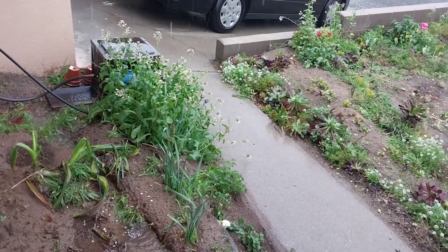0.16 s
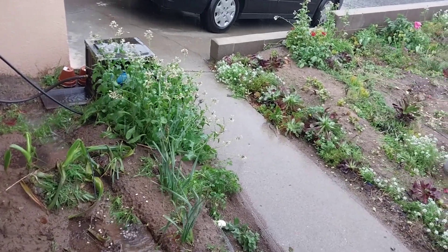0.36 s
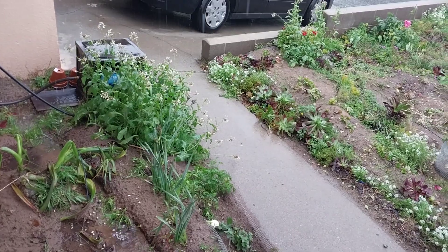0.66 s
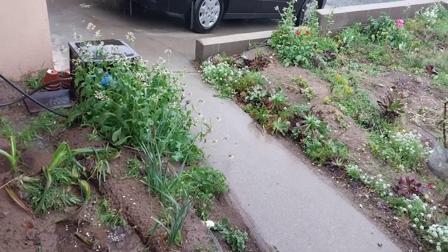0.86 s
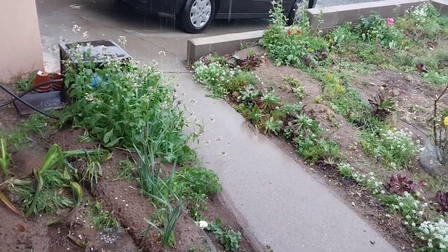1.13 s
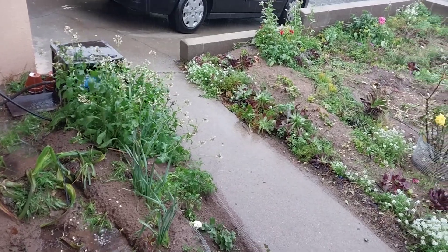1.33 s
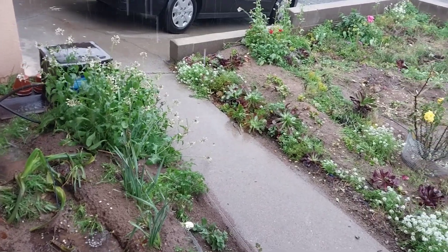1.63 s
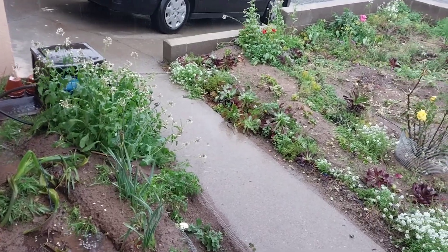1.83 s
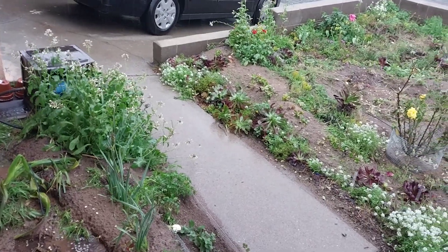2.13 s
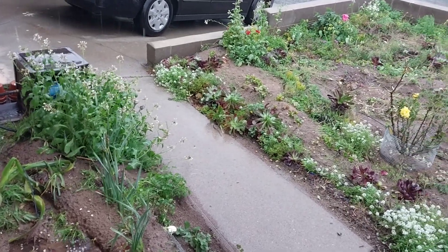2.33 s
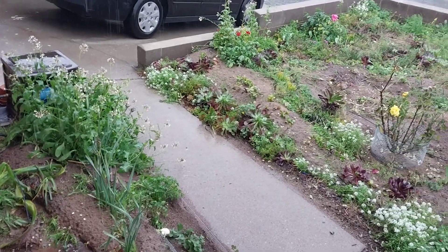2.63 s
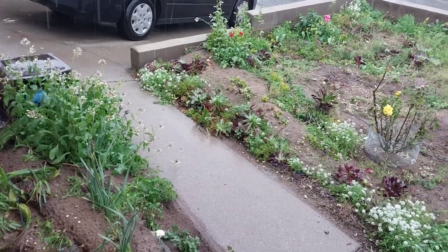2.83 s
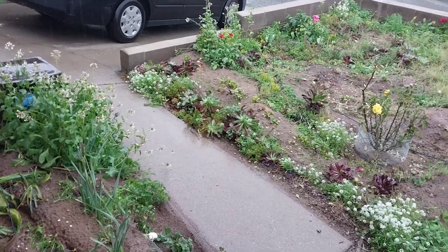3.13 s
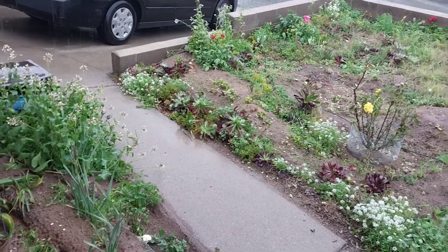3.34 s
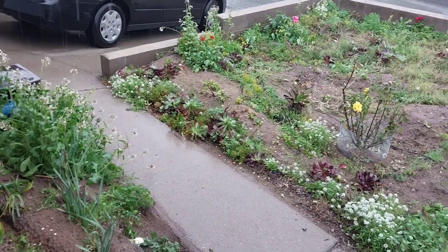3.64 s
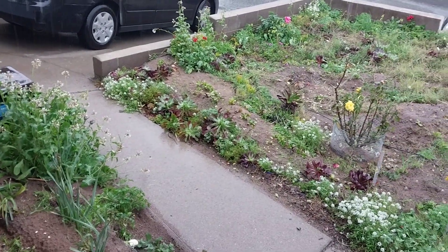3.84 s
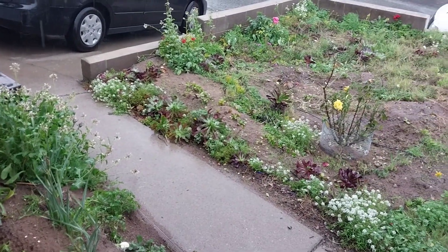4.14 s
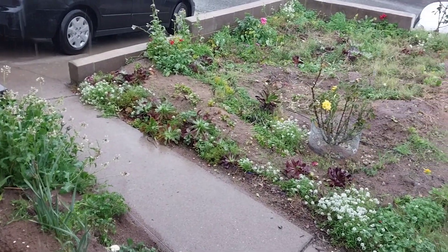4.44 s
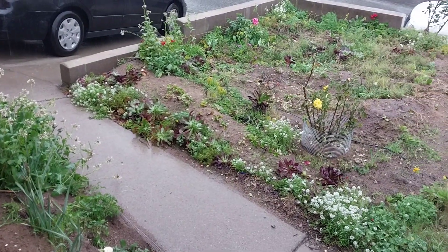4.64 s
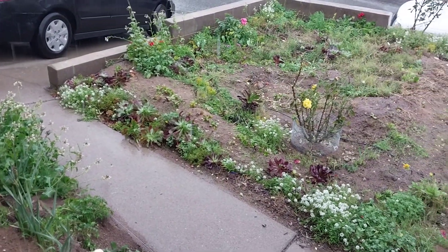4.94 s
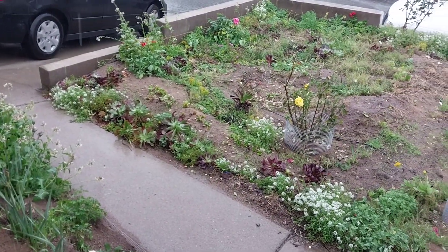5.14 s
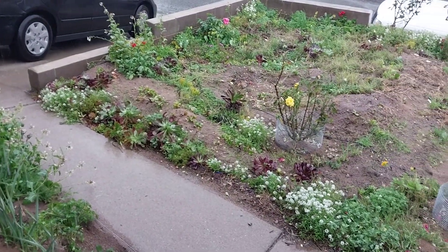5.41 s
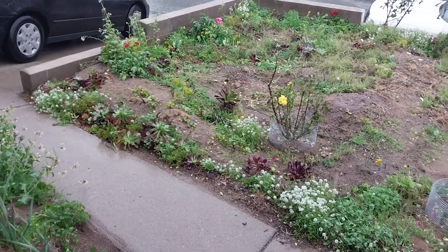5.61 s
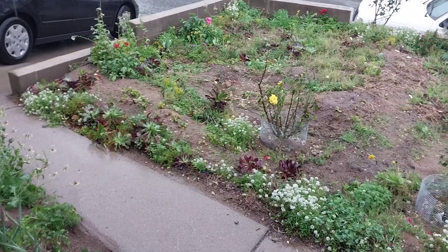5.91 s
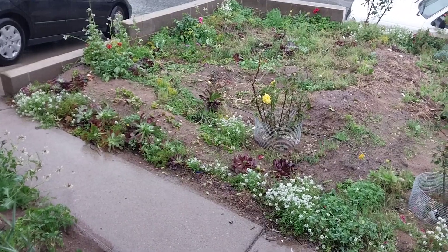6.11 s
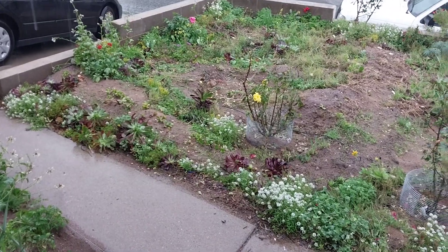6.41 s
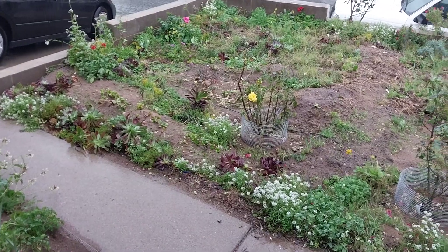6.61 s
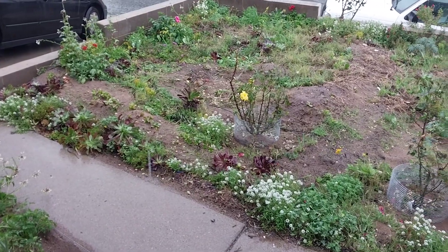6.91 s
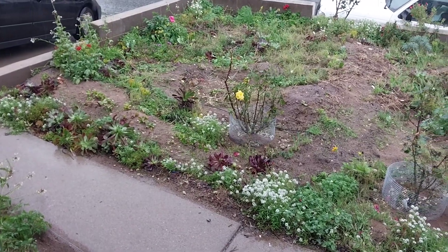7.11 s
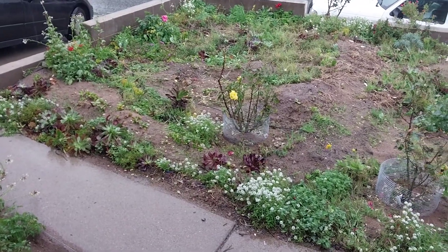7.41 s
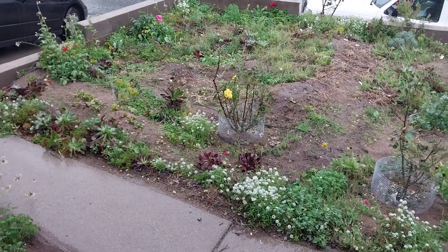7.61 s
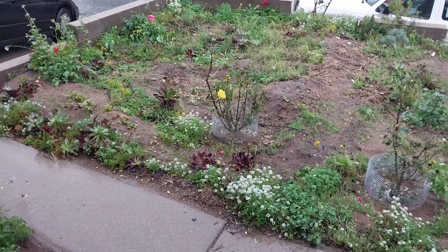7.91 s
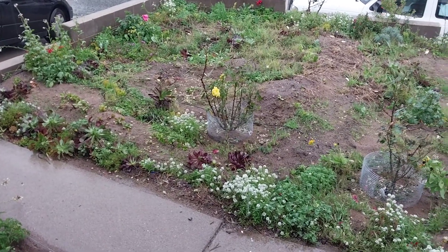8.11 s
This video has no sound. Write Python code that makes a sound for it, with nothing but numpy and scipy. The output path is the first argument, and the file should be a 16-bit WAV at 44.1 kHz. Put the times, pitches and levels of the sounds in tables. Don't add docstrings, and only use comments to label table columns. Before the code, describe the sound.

Steady rain falls in a garden, heard close through a hand-held stereo microphone. From 0 to 1.2 s heavy low wind thumps hit the left side hardest, peaking near 0.6-0.8 and 1.05 s, with separate weaker buffets on the right; sharp drips crack through, one strong at 0.9. Rain hiss dips around 1.25-2.3 s as smaller thuds fade out. From 2.7 s irregular close drops slap the path several times a second, each with bright fizz, brief wall echoes and wet splash; firm ones land near 2.75, 3.35, 5.75 and, loudest, 6.27 s. Small high puddle bubbles plop throughout; deep drain gurgles sound softly at 5.3 and 7.9 s. Behind lie fine leaf ticks, farther patter, wide hiss and a gently swelling low rumble. Light wind puffs return, with a modest buffet near 6.95 s, and rain continues to the end at 8.25 s.

```python
import sys
import numpy as np
from scipy import signal
from scipy.fft import rfft, irfft, next_fast_len
from scipy.io import wavfile
from scipy.ndimage import uniform_filter1d

SR = 44100
rng = np.random.default_rng(int(sys.argv[2]) if len(sys.argv) > 2 else 0)


def volts_from_decibels(level):
    exponent = np.asarray(level, float) / 20
    return 10 ** exponent


def inscribe(sig):
    pcm = np.round(np.clip(np.atleast_2d(sig).T, -1, 1) * 32767)
    wavfile.write(sys.argv[1], SR, pcm.astype(np.int16))


N = 364266

# start_s, rain_db, rumble_db
RAINFALL = [(0.0, -38.5, -47), (0.82, -40, -43.5), (1.25, -46, -49.5), (2.15, -46.5, -46),
            (2.3, -46.5, -53), (2.52, -41, -53), (2.65, -46, -50.5), (3.1, -43, -45.5),
            (3.45, -44.5, -45.5), (3.7, -42.5, -45.5), (4.4, -45.5, -46), (4.62, -43.5, -46),
            (5.07, -45, -46), (5.38, -43, -45), (6.1, -43.5, -47), (6.9, -43.5, -45.5), (7.22, -43, -47),
            (8.25, -44, -47.5)]
# freq_hz, level_db (per Hz)
RAIN_COLOUR = [(300, -0.5), (520, -3.5), (800, 0), (1260, -1), (1800, 0), (2700, -9.5), (4500, -7.5),
               (5500, -8), (7500, -6.5), (8150, -13.5), (10000, -10), (12500, -4.5), (15600, -10.5),
               (17000, -24)]


def evened(x):
    return x / np.sqrt(np.mean(x ** 2, axis=-1, keepdims=True) + 1e-20)


def read(points, hz):
    f, value = np.transpose(points)
    return np.interp(np.log(hz + 1), np.log(f + 1), value)


def curve(rows, column=1):
    rows = np.asarray(rows, float)
    return np.interp(np.arange(N) / SR, rows[:, 0], rows[:, column])


def add(mix, s, sound):
    part = mix[:, max(round(s * SR), 0):][:, :sound.shape[1]]
    part += sound[:, :part.shape[1]]


def humps(rows):
    fall_db = 17.5
    t, power = np.arange(0, N, 64) / SR, 0
    for s, peak_db, half_s in rows:
        distance = abs(t - s) / max(half_s, 0.01)
        power = power + volts_from_decibels(2 * (peak_db - fall_db * distance))
    return np.interp(np.arange(N) / SR, t, power)


def drips(rows, grain_db, tail_t60):
    # delay_s, level_db
    wall_echoes = [
        (.0055, -7),
        (.009, -13),
        (.017, -16),
    ]
    slap_q, skirt = 2.9, 0.42
    fizz_from_hz, fizz_gain_db = 9240, 8.5
    s, slap_db, slap_hz, fizz_db, splash_db = np.transpose(rows)
    count, size = len(s), 2048
    t, hz = np.arange(size) / SR, np.fft.rfftfreq(size, 1 / SR) + 1
    noise = rng.standard_normal((count, 3, size))

    crack = 0.55 * noise[:, :1] * np.exp(-t / 0.0005)
    crack[..., 0] = 1.2
    lag_s = 0.0004 * rng.random((count, 1, 1)) * np.array([[0], [1]])

    echo_s = np.transpose(wall_echoes)[0] * rng.uniform(0.91, 1.186, (count, 1, len(wall_echoes))) + 0.001
    echoes = 0
    for k, (_, db) in enumerate(wall_echoes):
        echoes = echoes + volts_from_decibels(db) * np.exp(-((t - echo_s[..., [k]]) / 0.00077) ** 2)
    swell = (1 - np.exp(-t / 0.00051)) * volts_from_decibels(-60 * t / tail_t60) * (1 - t / t[-1])
    spray = volts_from_decibels(2.2 * rng.standard_normal((count, 1, size // 32))).repeat(32, axis=2)
    splash = spray * noise[:, 1:] * (swell + volts_from_decibels(10.0) * echoes) * volts_from_decibels(splash_db - 5)[:, None, None]

    crack_spectrum = rfft(crack) * np.exp(-2j * np.pi * hz * (lag_s + 0.0005))
    splash_spectrum = rfft(splash) * volts_from_decibels(-3.0 * hz / 10000)
    z = np.array([crack_spectrum, splash_spectrum])
    grain = evened(uniform_filter1d(rng.standard_normal((count, len(hz))), size=46, axis=1))
    colour_db = read(RAIN_COLOUR, hz)
    z *= volts_from_decibels(grain_db * grain + colour_db - uniform_filter1d(colour_db, size=330))[:, None]

    tune = hz / slap_hz[:, None]
    detuning = 1j * slap_q * (tune - 1 / tune)
    slap = 1 / (1 + detuning / 3) * (skirt + 1 / (1 + detuning)) / (1 + (hz / 9000) ** 6)
    fizz = 1 / (1 + (fizz_from_hz / hz) ** 6) + 0 * tune
    sounds = 0
    for shape, db in ((slap, slap_db), (fizz, slap_db + fizz_db + fizz_gain_db)):
        blow, tail = irfft(z * shape[:, None], size)
        peak = abs(blow).max(axis=2).mean(1)
        sounds = sounds + (blow + tail) * (volts_from_decibels(db) / peak)[:, None, None]
    out = np.zeros((2, N))
    for start, sound in zip(s, sounds):
        add(out, start, sound)
    return out


def eave_drips():
    # start_s, slap_peak_db, slap_pitch_hz, fizz_db
    # (against slap), splash_db
    earlier = [(0.0361, -21, 2630, -8, -18.5), (0.0529, -17.5, 7460, -4, -16.5),
               (0.159, -17.5, 4230, -7, -16), (0.2685, -31, 5950, -13, -17), (0.316, -31, 7640, 5, -13),
               (0.3535, -27, 6100, 6.5, -15), (0.4234, -33, 6210, 11, -17), (0.5671, -29, 5750, -7, -14),
               (0.6601, -24.5, 3540, -3, -15), (0.7362, -29, 5690, 5, -15), (0.7598, -21, 4450, -4, -15),
               (0.812, -25, 5850, -1, -16), (0.8757, -11.5, 7060, -10, -23.5),
               (0.9173, -16.5, 2830, -11, -17.5), (0.9543, -22.5, 4000, -8, -18),
               (1.067, -33.5, 7440, -2, -10.5), (1.117, -32.5, 4400, -5, -13), (1.2471, -41, 4300, -20, -24),
               (1.3766, -20, 4200, -9, -25), (1.436, -34, 7510, -5, -17), (1.4681, -44, 5890, -15, -25),
               (1.5813, -42, 7380, 9, -15), (1.6575, -26.5, 5030, -6, -16.5), (1.703, -34, 7600, -5, -8.5),
               (1.8136, -39, 7390, -4, -18), (1.8312, -28, 3770, -10, -18), (1.895, -37, 4570, -7, -20),
               (2.0837, -35, 5330, -14, -20), (2.132, -35, 5150, -3, -13), (2.2752, -50, 3940, -18, -22),
               (2.2947, -29, 4810, -4, -20), (2.3321, -37, 6200, -5, -12), (2.4606, -27.5, 6400, -5, -16),
               (2.5092, -38, 3950, -7, -25), (2.5738, -27, 6040, 2, -17), (2.6559, -29, 5780, -10, -20),
               (2.7356, -15, 7300, -19, -20), (2.7535, -17.5, 5340, -4, -20),
              (2.8762, -23.5, 5030, -7, -15.5), (2.9804, -28.5, 4000, 0, -15),
              (3.0373, -30, 7260, -13, -20), (3.1052, -29.5, 7610, -7, -14), (3.1597, -25, 6200, -2, -16),
              (3.209, -26.5, 7620, 3, -18), (3.3, -36, 7060, -3, -9), (3.3443, -15, 5330, -21, -23),
              (3.3613, -22.5, 3930, -8, -14.5), (3.3945, -27, 6300, 7.5, -16),
              (3.4205, -21.5, 4890, -4, -20), (3.4857, -35, 4030, -8, -10), (3.5562, -18, 5230, -12, -17),
              (3.693, -36, 5110, 4, -18), (3.718, -23.5, 6500, -1, -14.5), (3.9124, -23, 3600, -4, -14),
              (3.982, -28.5, 4190, 1, -14), (4.0383, -26.5, 5840, -13, -21),
              (4.0624, -28.5, 7000, -2, -10.5), (4.1166, -30, 5750, -10, -16), (4.175, -33, 5290, 5.5, -19),
              (4.2618, -52, 5590, -5, -20), (4.327, -34.5, 3060, -3, -14.5), (4.4078, -30, 2550, -13, -24),
              (4.4454, -28, 3720, 2, -19), (4.4633, -28.5, 3770, -16, -14), (4.538, -27, 6000, -6, -27),
              (4.559, -38, 5040, 8, -12), (4.5826, -21, 4700, 0, -19), (4.6527, -27, 6400, -8, -16),
              (4.7472, -30.5, 5660, -5, -14.5), (4.7851, -28.5, 6000, -11, -23),
              (4.851, -35.5, 3600, -1, -9), (4.887, -32, 4960, 6, -23), (4.9193, -47, 6230, -3, -20),
              (4.9916, -34, 3750, -9, -15), (5.009, -33, 6340, -14, -20), (5.1116, -29.5, 7230, 6.5, -15.5)]
    # start_s, slap_peak_db, slap_pitch_hz, fizz_db, splash_db
    late = [(5.113, -41, 7220, 3, -21), (5.158, -30.5, 5100, -7, -14), (5.2802, -30.5, 5970, -5, -6.5),
            (5.3834, -33, 5450, -10, -10), (5.454, -28, 7200, -11, -19), (5.487, -34.5, 7400, -14, -8),
            (5.518, -34, 5290, -11, -18), (5.666, -18.5, 5760, -3.5, -22.5), (5.753, -28.5, 3000, -3, -17),
            (5.7655, -13, 6200, -0.5, -26), (5.86, -21, 4740, -25, -27), (5.915, -29, 6650, -14, -13.5),
            (6.056, -34, 6980, -6, -17), (6.0696, -22, 7280, -8, -15.5), (6.1784, -28, 7060, -5, -21),
            (6.2268, -34, 7790, 1, -16), (6.24, -20.5, 3940, -9, -14.5), (6.2692, -6.5, 6900, -8.5, -22),
            (6.334, -40, 6480, 14, -20), (6.4353, -18, 4100, -9, -12.5), (6.4956, -26, 2800, -2, -11),
            (6.5724, -22, 6200, -7, -15.5), (6.6684, -34, 5400, 2, -12), (6.8176, -30, 3960, -10, -16),
            (6.8642, -24, 6950, -15, -12), (6.9534, -32.5, 5250, 9, -19), (7.0688, -29.5, 5350, 7, -13.5),
            (7.1358, -27.5, 4030, -13, -12.5), (7.2923, -26, 4890, -6, -20),
            (7.312, -26.5, 3280, -5, -10.5), (7.3876, -48, 5560, -11, -30), (7.4635, -37, 5450, -10, -13),
            (7.5162, -31, 5400, -4, -17), (7.653, -35, 5490, -12, -16), (7.699, -25, 3600, -17, -20),
            (7.717, -26.5, 5270, 3, -20), (7.787, -20, 5550, -11, -16.5), (7.8387, -31.5, 3570, 0, -12),
            (8.0776, -28.5, 5700, 0, -20), (8.1143, -27, 4240, -4, -13)]
    # start_s, slap_peak_db, slap_pitch_hz, fizz_db, splash_db
    leaves = [(0.2284, -37, 7380, 10, -22), (0.5044, -34, 6310, 5, -25), (0.691, -39, 2250, 15, -30),
              (0.9338, -21.5, 3760, -6, -16), (0.9854, -29, 2400, 12, -19), (1.4047, -39.5, 6740, 10, -22),
              (1.5937, -34.5, 7380, 3, -20), (1.7397, -30, 5180, 3, -16), (2.1836, -40.5, 2690, 9, -14),
              (2.8876, -18, 4730, -6, -19), (3.3857, -28, 6960, 2, -22), (3.5024, -32, 7450, 1, -16),
              (3.565, -29, 7520, 0, -30), (3.899, -38, 3530, -2, -17), (4.3322, -26, 5630, 1.5, -18.5),
              (4.5687, -31, 5180, 1, -27), (4.597, -20, 4650, -11, -20), (4.6787, -29, 3730, -12, -19),
              (5.255, -33, 3780, -6, -17), (5.8477, -32, 5140, -24, -15), (5.9464, -33, 5270, 3, -12),
              (6.4617, -35, 3070, 3, -26), (6.4768, -27, 2630, -9, -25), (6.5144, -24.5, 5140, -19, -14),
              (6.738, -46, 2330, 21, -22), (6.886, -24, 5300, -15, -19), (7.7384, -45, 5170, 15, -26),
              (8.159, -32.5, 7610, 2, -10)]
    return drips(np.vstack([earlier, late, leaves]), grain_db=2.0, tail_t60=0.41)


def plops(rows, cycles):
    out = np.zeros((2, N))
    for (s, db, hz), twin in zip(rows, rng.uniform(0.93, 0.98, len(rows))):
        t = np.arange(0, cycles / hz, 1 / SR)
        turns = hz * (t[None] - [[0], [0.00006]])
        turns = turns * (1 + 0.00063 * turns)
        ring = np.sin(2 * np.pi * turns) + 1.43 * np.sin(2 * np.pi * twin * turns)
        decay = volts_from_decibels(db - 60 * hz * t / cycles)
        add(out, s, decay * (1 - np.exp(-hz * t / 9.8)) * ring)
    return out


def near_bubbles():
    # start_s, peak_db, pitch_hz
    puddle_bubbles = [(0.562, -39, 3240), (1.113, -39, 4430), (1.248, -33, 4450), (1.834, -35.5, 3850),
                      (1.986, -50, 847), (2.276, -47, 3950), (2.411, -38.5, 1856), (2.498, -50, 3900),
                      (2.859, -41, 1740), (3.316, -41, 1780), (3.361, -41, 1830), (3.396, -47, 3100),
                      (3.648, -40, 1706), (3.915, -52, 3550), (3.977, -37, 1970), (4.316, -46, 3070),
                      (4.458, -39, 3740), (4.481, -50, 2180), (4.842, -45, 1800), (4.957, -42, 2210),
                      (6.122, -39, 1870), (6.436, -32, 4630), (6.521, -40, 4600), (7.262, -40, 1800),
                      (7.307, -38, 3200), (7.791, -39, 2100), (7.853, -33.5, 3630), (8.11, -45, 4330),
                      (8.165, -47, 754)]
    # start_s, peak_db, pitch_hz
    drain_gurgles = [
        (1.639, -44, 1050),
        (5.308, -40.5, 376),
        (7.637, -56, 960),
        (7.889, -46.5, 373),
    ]
    return plops(puddle_bubbles + drain_gurgles, cycles=100.0)


def far_bubbles():
    u = rng.random((160, 3))
    rows = np.column_stack([u[:, 0] * N / SR, -53 + 8 * u[:, 1], 800 + 2200 * u[:, 2]])
    return plops(rows, cycles=90.0)


def patter(count, size_db, spread_db):
    u = rng.random((count, 3))
    start_s = u[:, 0] * N / SR
    peak_db = size_db - spread_db * np.log(u[:, 1] + 0.056)
    pitch_hz = 1800 * 4 ** u[:, 2]
    fizz_and_splash_db = np.clip(rng.standard_normal((count, 2)), -2, 1) * [5, 4] + [-5, -11]
    rows = np.column_stack([start_s, peak_db, pitch_hz, fizz_and_splash_db])
    return drips(rows, grain_db=2.5, tail_t60=0.24)


def ticks(per_s, spread_db):
    size = volts_from_decibels(spread_db * np.minimum(rng.exponential(1, (2, N)), 5))
    size *= rng.random((2, N)) < per_s / SR
    size *= rng.choice([-1., 1.], (2, N))
    hz = np.fft.rfftfreq(256, 1 / SR)
    bass_cut_db = 12 * np.log2(1 + (1800 / (hz + 1)) ** 2)
    tap = np.roll(irfft(volts_from_decibels(read(RAIN_COLOUR, hz) - bass_cut_db)), 128) * np.hanning(256)
    both_ports = size + 0.12 * np.roll(size[::-1], 12, axis=1)
    return evened(signal.oaconvolve(both_ports, tap[None], "same", axes=1))


def wash(spectrum, patchy_db, flicker_db, size):
    # freq_hz, likeness (0-1)
    port_likeness = [(60, 0.2), (250, 0.82), (450, 0.84), (750, 0.25), (1200, 0.79), (2500, 0),
                     (5000, 0.37), (15000, 0)]
    frames, hz = 4 * N // size + 5, np.fft.rfftfreq(size, 1 / SR)
    a, b, c, d, patches = rng.standard_normal((frames, len(hz), 5)).T
    patches = evened(uniform_filter1d(uniform_filter1d(patches, size=8, axis=0), size=10, axis=1))
    flicker = evened(uniform_filter1d(rng.standard_normal(frames), size=4))
    same = np.clip(read(port_likeness, hz), 0, 1)[:, None]
    late = np.exp(-2j * np.pi * 0.00058 * np.maximum(hz - 520, 0))[:, None]
    left = a + 1j * b
    right = late * same * left + np.sqrt(1 - same ** 2) * (c + 1j * d)
    z = np.array([left, right])
    z *= volts_from_decibels(read(spectrum, hz)[:, None] + patchy_db * patches + flicker_db * flicker)
    return evened(signal.istft(z, nperseg=size, noverlap=3 * size // 4)[1][:, :N])


def yard_rumble():
    # freq_hz, level_db (per Hz)
    yard_colour = [(120, -17.5), (180, -6), (212, 0.5), (245, -4.5), (290, -6), (325, -4), (370, -4.5),
                   (440, -8), (520, -13.5), (800, -14), (1200, -54)]
    # start_s (of the peak), peak_db, half_length_s
    brief_swells = [(2.381, -42, 0.064), (2.53, -43.5, 0.12), (2.751, -40, 0.062), (2.905, -42.5, 0.12),
                    (3.199, -42.5, 0.18), (3.408, -47, 0.082), (3.509, -41, 0.061), (3.96, -52, 0.14),
                    (4.069, -52, 0.044), (4.269, -46, 0.168), (4.515, -46, 0.23), (4.687, -46.5, 0.2),
                    (5.367, -44.5, 0.3), (5.882, -41.5, 0.18), (6.012, -44, 0.043), (6.956, -47, 0.06),
                    (7.221, -41.5, 0.099), (7.92, -39.5, 0.077), (8.069, -41.5, 0.058), (8.164, -40, 0.045)]
    swelling = np.sqrt(volts_from_decibels(2 * (curve(RAINFALL, column=2) - 1.0)) + humps(brief_swells))
    return swelling * wash(yard_colour, patchy_db=2.5, flicker_db=0.66, size=2048)


def eddies():
    eddy_s = 0.046
    t = np.arange(0, N / SR + eddy_s, eddy_s / 4)
    lumps = np.convolve(rng.standard_normal(1500), np.hanning(7), "same")[:len(t)]
    return np.interp(np.arange(N) / SR, t, evened(lumps))


def gusting(gusts, lumps):
    # start_s, level_db
    steady_air = [(0.0, -54), (1.1, -57), (1.2, -68), (2.0, -56.5), (2.28, -51), (2.4, -58), (2.65, -55.5),
                  (2.92, -52), (3.6, -59), (3.95, -49), (4.2, -56), (4.76, -50.5), (5.1, -52), (5.25, -51),
                  (5.9, -42), (6.2, -55), (6.6, -62), (8.25, -50)]
    # start_s (of the peak), peak_db, half_length_s
    light_puffs = [(2.423, -47, 0.14), (2.545, -47, 0.046), (2.914, -44.5, 0.18), (3.186, -47, 0.2),
                   (3.398, -48.4, 0.132), (3.506, -49.2, 0.07), (3.606, -48.5, 0.066), (3.777, -46, 0.068),
                   (3.942, -47, 0.14), (4.037, -45, 0.094), (4.156, -54, 0.054), (4.51, -49.5, 0.25),
                   (4.764, -46.9, 0.14), (4.954, -58, 0.199), (5.228, -45, 0.152), (5.333, -53, 0.064),
                   (5.473, -42.5, 0.12), (5.602, -44.5, 0.17), (5.863, -49, 0.06), (6, -45, 0.06),
                   (6.307, -50.4, 0.075), (6.412, -54, 0.159)]
    eddy_db = 1
    air_power = volts_from_decibels(2 * (curve(steady_air) - 6 + eddy_db * lumps))
    return 10 * np.log10(air_power + humps(gusts + light_puffs))


def port_winds():
    # start_s (of the peak), peak_db, half_length_s
    left_gusts = [(.05, -28.5, 0.11), (.14, -20, 0.079), (.33, -26, 0.12), (.5, -33.5, .06),
                  (.594, -15, 0.029), (.68, -16, 0.083), (.823, -14.5, 0.069), (.928, -36, 0.072),
                  (1.038, -10, 0.051), (1.11, -18, 0.025), (1.287, -39, 0.034), (1.382, -47, 0.056),
                  (1.546, -23, 0.02), (1.62, -35, 0.036), (1.69, -30, 0.091), (1.956, -32, 0.019),
                  (2.434, -49, 0.073), (5.24, -36.5, 0.024), (5.627, -39, 0.04), (5.862, -42, .15),
                  (6.445, -52, 0.18), (6.715, -45, 0.032), (6.87, -35, 0.035), (6.949, -26.5, 0.027),
                  (7.18, -39.5, 0.32), (7.47, -42.5, 0.2), (7.638, -51, 0.024), (7.8, -37, 0.063),
                  (8.0, -43, 0.19), (8.166, -50, 0.03)]
    # start_s (of the peak), peak_db, half_length_s
    right_gusts = [(.115, -39, 0.38), (.35, -39, 0.36), (.504, -27, 0.054), (.654, -34, .15),
                   (.743, -33, .1), (.908, -27, 0.069), (.968, -23.5, 0.042), (1.028, -26, 0.043),
                   (1.127, -20, 0.024), (1.22, -40, 0.078), (1.307, -31, 0.027), (1.37, -31.5, 0.073),
                   (1.477, -29.5, 0.066), (1.616, -27, 0.0088), (1.69, -29, 0.03), (1.755, -35, 0.076),
                   (1.856, -40, 0.035), (1.965, -23.5, 0.04), (2.434, -37.5, 0.065), (5.602, -31.5, 0.046),
                   (6.71, -54, 0.13), (6.86, -34, 0.16), (6.944, -28.5, 0.04), (7.1, -40, 1),
                   (7.3, -45, .1), (7.673, -36.5, 0.13), (7.807, -33, 0.026), (7.9, -40, .08)]
    lumps = eddies()
    return np.array([gusting(left_gusts, lumps), gusting(right_gusts, lumps)])


def wind(levels_db):
    # freq_hz, level_db (per Hz)
    breeze_colour = [(15, -50), (35, -10), (60, 0.5), (78, -3.5), (100, -1.5), (140, -8), (250, -18),
                     (600, -42.5)]
    # freq_hz, level_db (per Hz)
    gust_colour = [(15, -46), (35, -23), (60, -5), (108, 3), (200, -8), (300, -25), (500, -34), (900, -53)]
    size = next_fast_len(N)
    hz = np.fft.rfftfreq(size, 1 / SR)
    white = rfft(rng.standard_normal((3, size)))
    calm = evened(irfft(white * volts_from_decibels(read(breeze_colour, hz)))[:, :N])
    gust = evened(irfft(white * volts_from_decibels(read(gust_colour, hz)))[:, :N])
    shared = np.clip((-24.5 - levels_db.max(0)) / 14, 0, 0.8)
    strong = np.clip((levels_db + 41.5) / 16, 0, 1)
    calm = np.sqrt(shared) * calm[2] + np.sqrt(1 - shared) * calm[:2]
    air = (1 - strong) * calm + strong * gust[:2]
    air = evened(air / (uniform_filter1d(air ** 2, size=1500, axis=1) + 0.05) ** 0.49)
    push = air * volts_from_decibels(levels_db)
    return signal.lfilter(*signal.butter(2, 35, "high", fs=SR), push - 2.23 * push ** 2)


def scene():
    levels_db = port_winds()
    rain_db = curve(RAINFALL, column=1)
    near = volts_from_decibels(2.5) * eave_drips() + volts_from_decibels(6.0) * near_bubbles()
    small = volts_from_decibels(rain_db + 46.5) * (patter(count=400, size_db=-42.5, spread_db=3.5) + far_bubbles())
    far = volts_from_decibels(rain_db + 0.5) * wash(RAIN_COLOUR, patchy_db=2.5, flicker_db=0.5, size=256)
    far = far + volts_from_decibels(rain_db - 17.5) * ticks(per_s=230, spread_db=10.5)
    excess_db = uniform_filter1d(np.maximum(levels_db + 39, 0), size=20000, axis=1)
    lean = volts_from_decibels(-0.3 * (excess_db - excess_db.mean(0)) + [[-0.3], [0.3]])
    shut = volts_from_decibels(2.8 * np.clip(levels_db + 60.0, -25, 0))
    return (far + small + near) * lean + shut * yard_rumble() + wind(levels_db)


def low_pass(x):
    return signal.sosfilt(signal.butter(12, 16980, fs=SR, output="sos"), x)


def record(dry):
    edge = signal.firwin(767, 15950, window=("kaiser", 3), fs=SR)
    soft = 0.9 * np.tanh(dry / 0.9)
    mix = signal.oaconvolve(soft, edge[None], "same", axes=1)
    return low_pass(mix)


dry = scene()
out = record(dry)
inscribe(out)
```